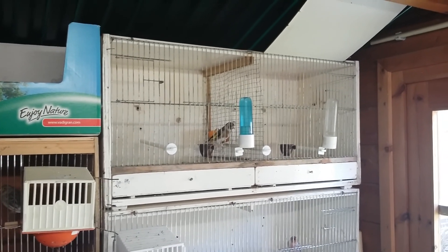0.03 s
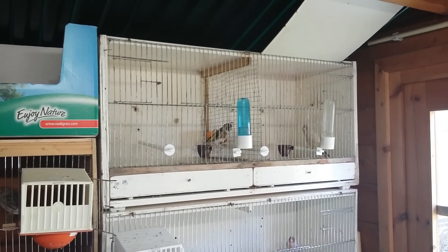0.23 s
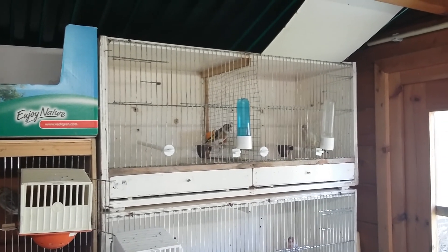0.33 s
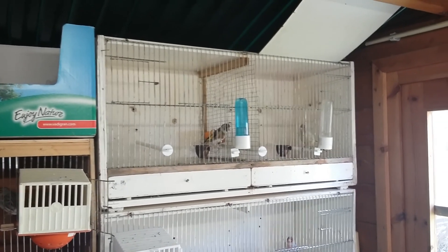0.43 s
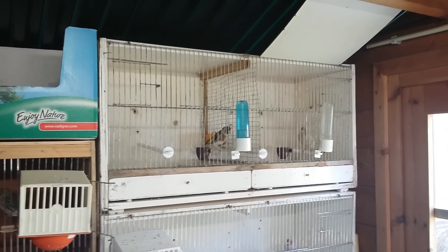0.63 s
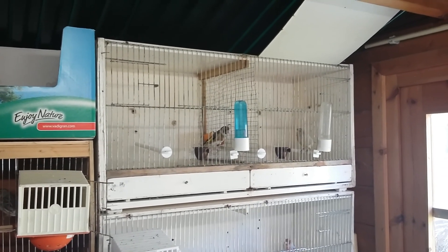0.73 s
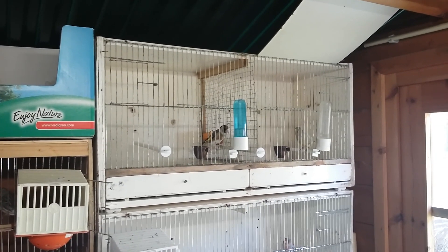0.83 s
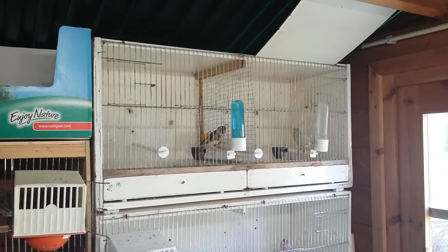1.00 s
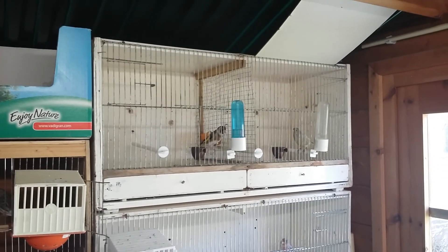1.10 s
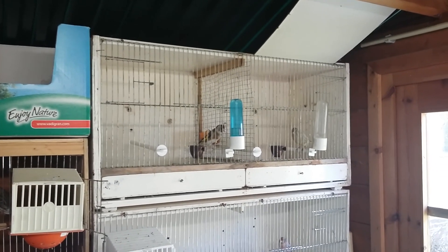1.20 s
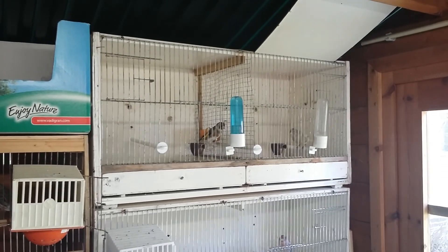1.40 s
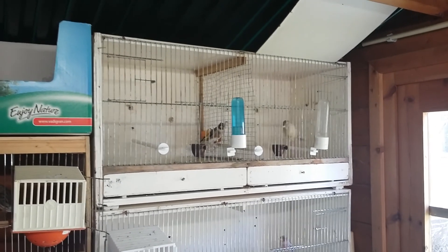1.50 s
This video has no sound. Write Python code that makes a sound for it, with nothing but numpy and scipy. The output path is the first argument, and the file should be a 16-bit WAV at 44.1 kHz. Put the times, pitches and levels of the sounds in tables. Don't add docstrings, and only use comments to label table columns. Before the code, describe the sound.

A small caged finch sings three high whistles then a rapid trill of ten rising chirps

```python
import sys
import numpy as np
from scipy import signal
from scipy.fft import rfft, irfft, next_fast_len
from scipy.io import wavfile
from scipy.ndimage import uniform_filter1d, map_coordinates

SR = 44100
rng = np.random.default_rng(int(sys.argv[2]) if len(sys.argv) > 2 else 0)


def pcm_store(signal):
    levels = np.round(np.clip(np.atleast_2d(signal), -1, 1) * 32767)
    wavfile.write(sys.argv[1], SR, levels.astype(np.int16).T)


def gain_from_db(level_db):
    decades = np.asarray(level_db, float) / 20
    return 10 ** decades


N = 68355
T = np.arange(N) / SR


def unit(x):
    return x / np.sqrt(np.mean(x ** 2) + 1e-20)


def along(points, hz):
    f, v = np.transpose(points)
    return np.interp(np.log(hz + 1), np.log(f + 1), v)


def wobble(rate):
    knots = rng.standard_normal(int(N * rate / SR) + 4)
    return map_coordinates(knots, [T * rate])


def filtered(x, response):
    m = next_fast_len(N + SR // 2)
    return irfft(rfft(x, m) * response(np.fft.rfftfreq(m, 1 / SR)), m)[..., :N]


# (frequency [Hz], left-right correlation)
ALIKE = [(60, 1), (300, 0.9), (700, 0.48), (1400, -0.0099), (2500, -0.13), (8000, -0.097)]


def rush(spectrum, patchy_db):
    z = signal.stft(rng.standard_normal((2, N)), nperseg=512)[2]
    field = uniform_filter1d(rng.standard_normal(z.shape[1:]), size=5, axis=0)
    field = uniform_filter1d(field, size=10, axis=1)
    pair = signal.istft(z * gain_from_db(patchy_db * unit(field)), nperseg=512)[1][:, :N]

    def mid_side(hz):
        turn = np.arccos(np.clip(along(ALIKE, hz), -1, 1)) / 2
        inside = (hz > spectrum[0][0]) * (hz < spectrum[-1][0])
        return gain_from_db(along(spectrum, hz)) * inside * [np.cos(turn), np.sin(turn)]

    mid, side = filtered(pair, mid_side)
    return unit(np.array([mid + side, mid - side]))


# (frequency [Hz], decay time T60 [s])
SHED = [(300, 0.37), (2500, 0.12), (5000, 0.22), (8000, 0.12), (12000, 0.15), (15000, 0.1)]


def shed(x, delay_s):
    t, z = signal.stft(rng.standard_normal((2, SR // 2)), SR, nperseg=128)[1:]
    hz = np.arange(z.shape[1]) * SR / 128
    tail = signal.istft(z * gain_from_db(-60 * t / along(SHED, hz)[:, None]), SR, nperseg=128)[1]
    tail = tail * np.clip(np.arange(tail.shape[1]) / SR / delay_s, 0, 1)
    return signal.fftconvolve(np.atleast_2d(x), tail / np.linalg.norm(tail[0]), axes=1)[:, :N]


def note(s, hz, db, overtones_db, scoop_hz=0):
    s = np.sort(s)
    scoop = scoop_hz * np.exp(-np.abs(T - s[0]) / 0.006)
    pitch = uniform_filter1d(np.interp(T, s, hz), size=64) - scoop
    phase = 2 * np.pi * np.cumsum(pitch) / SR
    ends = np.clip(np.minimum(T - s[0], s[-1] - T) * 400, 0, 1)
    overtones = sum(gain_from_db(g) * np.sin((k + 2) * phase) for k, g in enumerate(overtones_db))
    parts = np.array([np.sin(phase), overtones])
    level_db = uniform_filter1d(np.interp(T, s, db), size=64) - np.max(db)
    overtone_tilt = 0.55
    return np.sqrt(2) * gain_from_db(np.max(db) + level_db * np.c_[[1, overtone_tilt]]) * ends * parts


# (time [s], level [dB])
HUM = [(0, -44.5), (.09, -43.5), (.24, -50), (.5, -42.5), (.71, -44.5), (1.15, -46), (1.49, -43.5),
       (1.55, -42.5)]


def hum():
    hum_hz, lead_rad = 88.2, 0.045
    level = gain_from_db(np.interp(T, *np.transpose(HUM)) + 0.4 * wobble(18))
    phase = 2 * np.pi * np.cumsum(hum_hz + 0.66 * wobble(4)) / SR
    return np.sqrt(2) * level * np.sin(phase + lead_rad * np.c_[[1, -1]])


# (time [s], level [dB])
MURMUR = [(0, -53), (.12, -60), (.2, -53), (.45, -53.5), (.52, -48), (.66, -48), (.85, -52.5), (.96, -58.5),
          (1.0, -50.5), (1.27, -56), (1.43, -62), (1.55, -53)]
# (frequency [Hz], density [dB])
AIR = [(180, -27), (300, -5), (900, -10), (2000, -15), (5000, -22.5), (8000, -36), (10000, -69)]
RUMBLE = [(15, -36.5), (25, -13), (40, -14), (55, -1), (70, -0.5), (80, -21), (110, -27), (140, -82)]
DRONE = [(105, -37.5), (135, -2.5), (170, -1.5), (260, -5), (450, -29.5)]
HISS = [(5000, -27), (7500, -7), (12000, -6), (16000, -8.5)]


def background():
    rumble_db, drone_db, hiss_db = -64, -55.5, -78.5
    murmur = gain_from_db(np.interp(T, *np.transpose(MURMUR)) + 2.3 * wobble(29)) * rush(AIR, patchy_db=2.0)
    low = gain_from_db(rumble_db) * rush(RUMBLE, patchy_db=1.5) + gain_from_db(drone_db) * rush(DRONE, patchy_db=2.0)
    return murmur + low + gain_from_db(hiss_db) * rush(HISS, patchy_db=0.3)


# (time [s], length [s], first pitch [Hz], last pitch [Hz], level [dB])
CHIRPS = [
    (.396, 0.024, 2700, 2040, -47),
    (0.41, .02, 2200, 2355, -51),
    (.452, 0.011, 2012, 2763, -38.5),
    (.461, .014, 2710, 2757, -35),
    (.471, 0.015, 2723, 1844, -36),
    (0.497, .02, 2350, 2670, -43),
    (0.001, 0.014, 4250, 4260, -58.5),
    (0.027, 0.041, 4250, 4800, -63),
]


def far_bird():
    x = 0
    for s, length, first, last, db in CHIRPS:
        times = [s, s + 0.35 * length, s + length]
        pitch = [first, (first + last) / 2, last]
        x = x + note(times, pitch, [db + 2, db, db - 4.5], [-26]).sum(axis=0)
    x = x * gain_from_db(4 * wobble(200))
    return gain_from_db([[-7], [-5]]) * x + shed(x, 0.0048)


def resonances(peaks):
    def response(f):
        total = 0
        for k, (centre, width, db) in enumerate(peaks):
            mode = 1j * f * width / (centre * centre - f * f + 1j * f * width)
            total = total + (-1) ** k * gain_from_db(db) * mode
        return total
    return response


# (time [s], level [dB], rise [s], wire share [dB], scuff share [dB])
HOPS = [(.03, -52, 0.017, 1, 6.5), (0.044, -40.5, 0.0063, -9.5, 11), (.06, -45, 0.0079, -19, 7),
        (0.083, -48, 0.0052, -9.5, 8), (0.111, -52, .005, -12, 4.5), (.485, -54, 0.0038, -5.5, 12),
        (0.602, -50.5, 0.0076, -24, 9), (0.984, -57, 0.012, -9, 8.5), (1.155, -60.5, 0.0037, -3, 9.5),
        (1.291, -55.5, 0.0048, 7.5, -0.5), (1.321, -52, 0.015, 6, -4.5), (1.471, -38, 0.0039, -17, -2),
        (1.513, -38.5, 0.012, -7, -7.5), (1.53, -53, .016, -0.5, -9)]
# (frequency [Hz], width [Hz], level [dB])
PERCH = [(620.6, 22, 4.5), (790, 15, 0), (1160, 53, -5.5), (1303, 20, -3)]
WIRE = [(1400, 67, -6.5), (2200, 110, 3), (4250, 390, -1.5), (4750, 220, -1.5), (5600, 760, -3.5)]
# (frequency [Hz], level [dB])
SCUFF = [(120, -22), (250, -1.5), (550, 3.5), (1200, -5.5), (2300, -16), (5500, -26), (8000, -41),
         (16000, -73)]


def hops():
    rattle_t60_s, scuff_db = 0.067, 9.5
    shake = 0
    for s, db, rise, wire_db, scuff_share_db in HOPS:
        levels_db = np.c_[[db, db + wire_db, db + scuff_share_db]]
        decay = gain_from_db(levels_db - 60 * np.abs(T - s) / rattle_t60_s)
        shake = shake + decay * np.clip((T - s) / rise + 0.5, 0, 1)
    perch, wire, scuff = shake * rng.standard_normal((3, N)) * gain_from_db(5.55 * wobble(300))
    x = gain_from_db(17) * (filtered(perch, resonances(PERCH)) + filtered(wire, resonances(WIRE)))
    x = filtered(x, lambda f: 1 / (1 + 1j * f / 4800) ** 2)
    x = x + gain_from_db(scuff_db) * filtered(scuff, lambda f: gain_from_db(along(SCUFF, f)))
    to_room = filtered(x, lambda f: f / (f + 700))
    return gain_from_db([[-4], [-2.5]]) * x + gain_from_db(1.0) * shed(to_room, 0.0017)


# (time [s], frequency [Hz], level [dB],
# T60 [s])
RINGS = [(0.042, 1160, -42, 0.13), (0.042, 1920, -37.5, 0.08), (0.45, 355, -53, 0.39),
         (0.598, 780, -46, 0.2), (0.611, 435, -43.5, 0.55), (0.609, 905, -48.5, 0.24),
         (.72, 800, -54.5, 0.77), (.99, 740, -51.5, 0.45), (0.9, 1300, -59, 0.19), (1.0, 1750, -52.5, 0.23),
         (1.15, 670, -56, 0.94),
         (.142, 1620, -44, .045), (.142, 2200, -47, .035), (1.289, 2200, -54, .08), (1.314, 2180, -47, .1),
          (1.321, 1340, -49, .12), (1.32, 4300, -54, .22), (1.47, 1310, -43, .2), (1.469, 2230, -48, .1),
          (1.47, 4780, -61, .2), (1.512, 1310, -44, .2), (1.51, 2230, -50, .2)]


def rings():
    total, blur_rad = 0, 1
    for s, hz, db, t60 in RINGS:
        side = rng.uniform(-1, 0.89) * np.c_[[1, -1]]
        level = gain_from_db(db - 60 * np.abs(T - s) / t60 + 4.0 * side) * np.clip((T - s) / 0.0049, 0, 1)
        total = total + level * np.sin(2 * np.pi * hz * T + blur_rad * wobble(45) + 1.1 * side)
    return total


# (frequency [Hz], level [dB])
CAGE_LOW = [(4930, -3.5), (4998, -9.5), (5081, -10)]
CAGE_HIGH = [(5883, -48), (5936, -43.5), (5992, -41.5), (6065, -46.5), (6130, -48.5), (6272, -45.5),
             (6355, -48), (6516, -45.5), (6702, -48.5), (6788, -52.5), (6977, -55.5)]


def cage(x):
    low_db, high_db, t60_s = -58, -9, 0.18
    t = T[:SR // 3]
    modes = [(hz, db + low_db) for hz, db in CAGE_LOW] + [(hz, db + high_db) for hz, db in CAGE_HIGH]
    ring = 0
    for hz, db in modes:
        turns = rng.random((2, 1))
        ring = ring + gain_from_db(db - 60 * t / t60_s) * np.sin(2 * np.pi * (hz * t + turns))
    return signal.fftconvolve(x[None], ring * np.clip(t / 0.0028, 0, 1), axes=1)[:, :N]


# (time [s], pitch [Hz], level [dB])
WHISTLES = [
    [(.199, 4798, -52.5), (.211, 4977, -33.5), (.22, 4996, -24.5), (.235, 5016, -19.5), (.252, 4990, -27.5),
     (.262, 4991, -25), (.28, 5050, -38.5), (.294, 5010, -55)],
    [(.311, 4857, -45), (.319, 4867, -36), (.331, 4947, -16.5), (.34, 4920, -24), (.357, 4912, -17.5),
     (.367, 4954, -19.5), (.374, 5117, -34), (.4, 5150, -47)],
    [(.428, 4770, -39), (.437, 5003, -31.5), (.451, 4917, -14), (.465, 4942, -23), (.474, 4932, -17),
     (.487, 4904, -19), (.493, 5040, -38), (.53, 5004, -57.5)],
]
# (level [dB], level [dB])
WHISTLE_OVERTONES_DB = [
    [-34, -39.5],
    [-42, -41.5],
    [-47, -41.5],
]
SCOOP_HZ = [895, 593, 550]


def whistles():
    settings = zip(WHISTLES, WHISTLE_OVERTONES_DB, SCOOP_HZ)
    return sum(note(*np.transpose(rows), overtones_db, scoop) for rows, overtones_db, scoop in settings)


# (time of the loud moment [s], peak level [dB], stretch [ratio])
TRILL = [
    (0.612, -20.5, 1.01),
    (0.676, -18, 1.01),
    (0.7455, -18.5, 1),
    (0.8164, -18.5, 1.2),
    (0.885, -16, 1.01),
    (0.9536, -15.5, 1.01),
    (1.0214, -15, 0.94),
    (1.0914, -16, 1.01),
    (1.1606, -15.5, 1.01),
    (1.243, -15.5, 1.01),
]
# (time from the loud moment [s], pitch [Hz], level [dB])
PIP = [(-.023, 4630, -31), (-.018, 5144, -17.5), (-.0135, 5440, -30.5)]
SWEEP = [(-.0135, 5330, -34.5), (-.0105, 5560, -20.5), (-.004, 6140, -4.5), (.002, 6300, 0.5),
         (.0045, 6990, -8), (.0065, 7500, -11), (0.008, 7850, -20), (0.01, 8180, -13.5),
         (0.013, 8260, -39.5)]
SWEEP_OVERTONES_DB = [-19.5, -63]


def trill():
    pitch_scatter, rough_db = 0.0061, 2.5
    total = 0
    for at, peak_db, stretch in TRILL:
        pitch_chance, level_chance = rng.standard_normal(2)
        for rows, scatter_db in [(PIP, 2), (SWEEP, 0)]:
            s, hz, db = np.transpose(rows)
            level_db = db + peak_db - 5 + scatter_db * level_chance
            pitch = hz * (1 + pitch_scatter * pitch_chance)
            total = total + note(at + s * stretch, pitch, level_db, SWEEP_OVERTONES_DB)
    return total * gain_from_db(rough_db * wobble(250))


# (frequency [Hz], level [dB])
MIC = [(4000, 2.5), (8300, -1), (9300, -7.5), (10200, -3.5), (10900, -11), (11800, -5), (13000, -24),
       (15500, 2)]
WHISTLE_DIRECT_DB = [
    [7],
    [-21],
]
TRILL_DIRECT_DB = [
    [2.5],
    [-14.5],
]
SINGER_ROOM_DB = [
    [4],
    [-12.5],
]
OVERTONE_DIRECT_DB = [
    [-10],
    [-18],
]
OVERTONE_ROOM_DB = [
    [-0.5],
    [-6],
]


def singer():
    held, swept = filtered(np.array([whistles(), trill()]), lambda f: gain_from_db(along(MIC, f)))
    sent = gain_from_db(-6) * held[0] + filtered(swept[0], lambda f: np.where(f < 5350, 0.52, 1))
    direct = gain_from_db(WHISTLE_DIRECT_DB) * held[0] + gain_from_db(TRILL_DIRECT_DB) * swept[0]
    room = gain_from_db(SINGER_ROOM_DB) * (shed(sent, 0.0058) + cage(sent))
    high = (held[1] + swept[1]) * gain_from_db(3 * wobble(90))
    overtones = gain_from_db(OVERTONE_DIRECT_DB) * high + gain_from_db(OVERTONE_ROOM_DB) * shed(high, 0.0029)
    return direct + room + overtones


def scene():
    return hum() + background() + far_bird() + hops() + rings() + singer()


def top_cut(x):
    return signal.sosfilt(signal.butter(12, 16440, fs=SR, output="sos"), x)


def record(dry):
    top_hz = 15830
    mix = filtered(dry, lambda hz: hz < top_hz)
    return top_cut(mix)


dry = scene()
out = record(dry)
pcm_store(out)
```